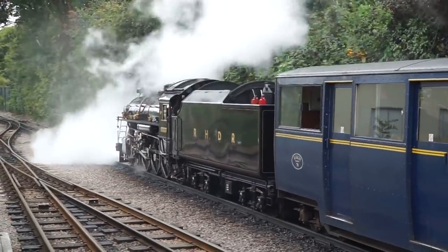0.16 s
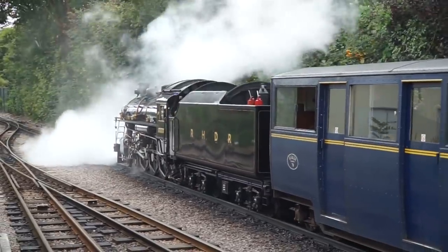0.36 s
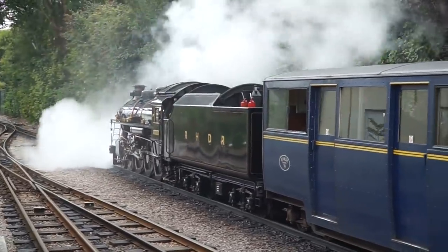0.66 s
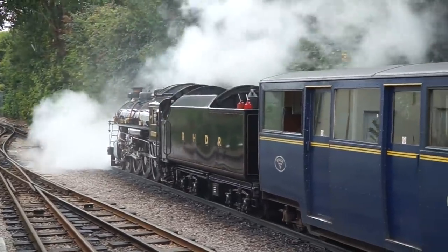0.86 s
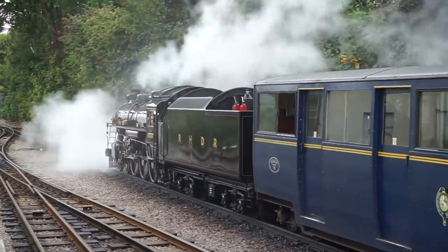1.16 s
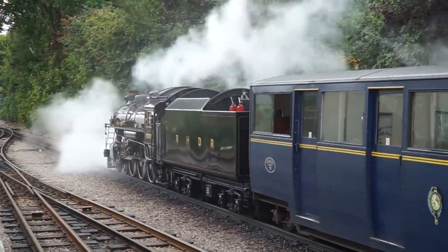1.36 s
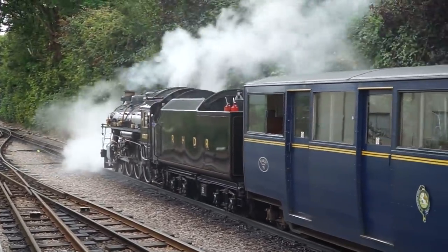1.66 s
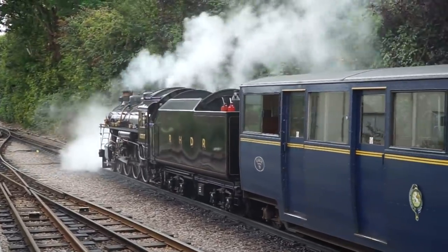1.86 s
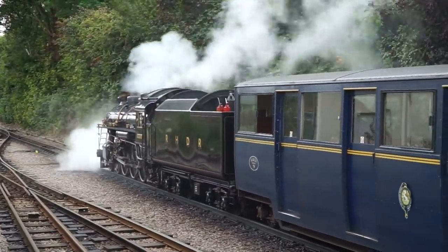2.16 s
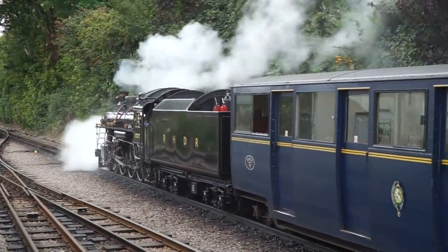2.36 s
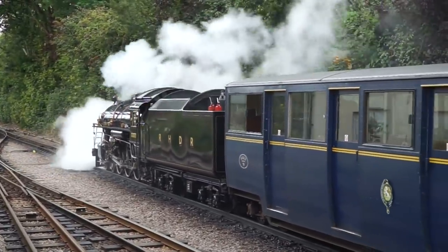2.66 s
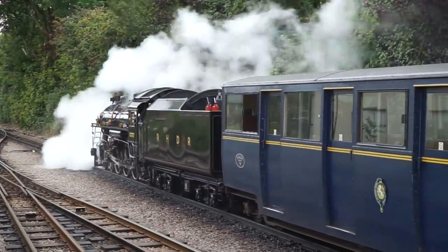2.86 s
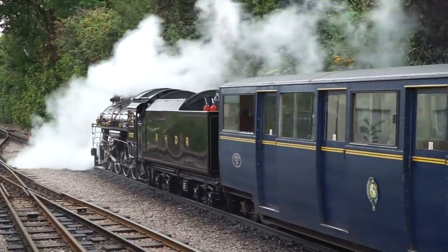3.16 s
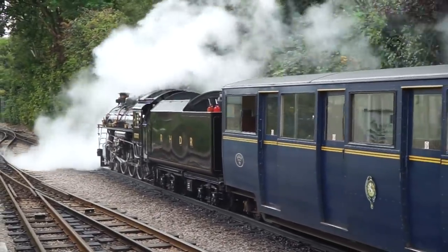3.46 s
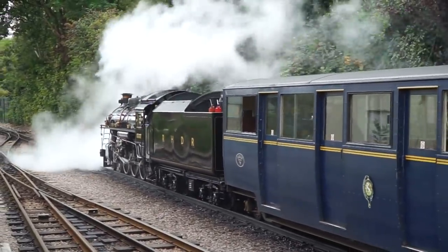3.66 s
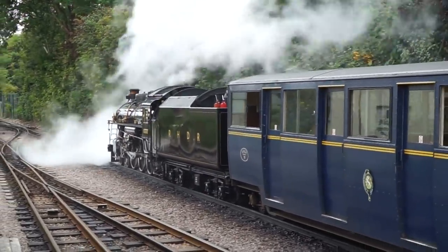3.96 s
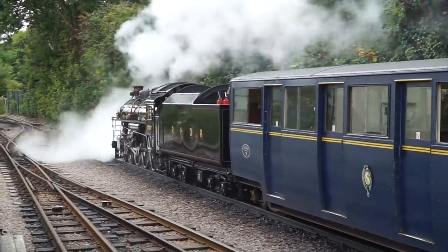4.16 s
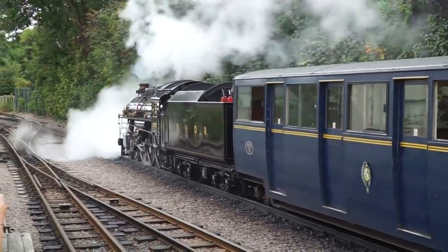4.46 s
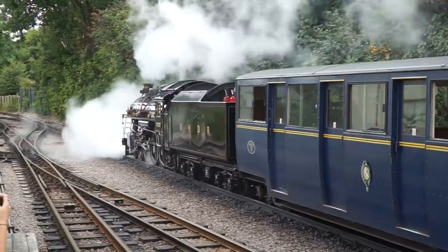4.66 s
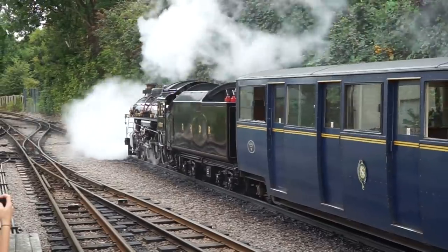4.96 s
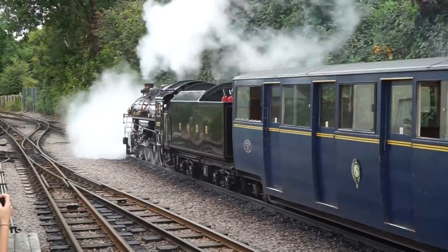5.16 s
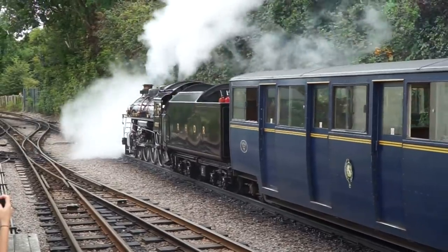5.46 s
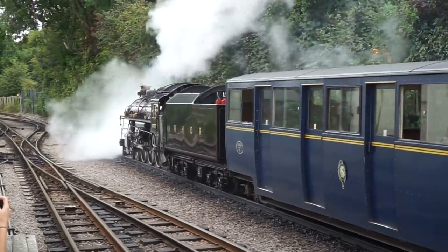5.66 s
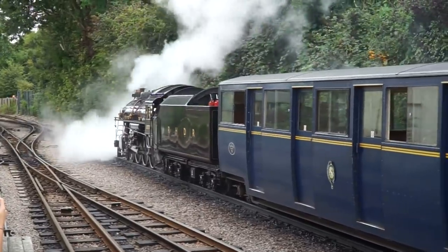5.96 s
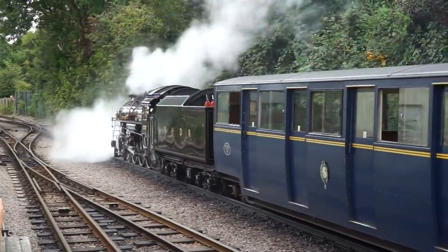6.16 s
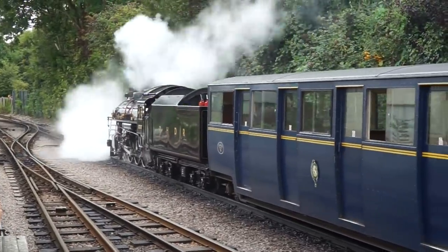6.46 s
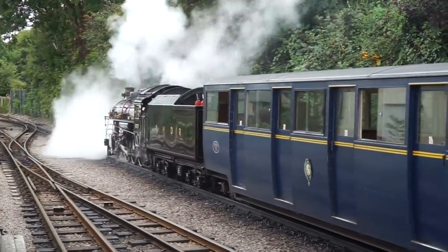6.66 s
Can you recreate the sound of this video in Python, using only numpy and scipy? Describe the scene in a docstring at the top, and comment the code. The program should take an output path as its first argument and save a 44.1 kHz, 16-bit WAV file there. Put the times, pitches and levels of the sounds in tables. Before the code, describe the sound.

Continuous escaping steam, wide and bright, shimmers over a breathy pipe-like roar. Underneath, muffled exhaust puffs come about three a second with uneven accents, gradually quickening. The open-air microphone catches a few brief wind bumps, then a violent burst of low flapping and cracking from about 2.6 to 4 seconds that pushes the steam down. Rumbling lingers mostly at left until 5.4 seconds; the steam then returns clearly.

```python
"""At a station, a miniature steam locomotive draws slowly away with its cylinder drain cocks open.
The jets are filtered noise: a bright hiss over a hollow roar with ringing pipes in it.
Beneath them the chimney beats softly in noise puffs, four to a wheel turn, gathering speed.
Wind buffets the two microphone ports as low noise with short hard blows; hiss and roar are heard
to dip under hard wind and recover slowly, and a limiter ducks everything at peaks over its ceiling."""
import sys
import numpy as np
from scipy import signal
from scipy.fft import rfft, irfft
from scipy.io import wavfile
from scipy.ndimage import uniform_filter1d, minimum_filter1d

SR = 44100
rng = np.random.default_rng(int(sys.argv[2]) if len(sys.argv) > 2 else 0)


def transcribe(u):
    """Save the signal u as a 16-bit wav file named by the first command-line argument.

    u: samples, shape (n,) or (channels, n), limited to [-1, 1]; the rate is SR.
    q: integer samples, one column per channel.
    """
    v = np.clip(np.atleast_2d(u).T, -1, 1)
    q = np.round(v * 32767).astype(np.int16)
    wavfile.write(sys.argv[1], SR, q)


N = 299872

# heard level of hiss and roar, including dips under hard wind and slow recoveries:
# time_s, relative level_db
HEARD_LEVEL = [(0, -26), (.45, -28.5), (1.46, -31), (1.85, -25.5), (2.14, -28.5), (2.58, -21), (2.82, -22),
               (2.92, -28), (3.38, -28.5), (3.58, -39.5), (3.88, -38), (4.15, -33), (4.35, -35.5),
               (5.2, -34.5), (5.45, -39), (6.02, -31), (6.53, -27), (6.8, -27)]


def drain_cocks(flutter_db=0.78, edge_hz=9000):
    """Turbulent jets: a bright hiss whose top comes and goes with their sharpness."""
    # spectrum of the hiss: frequency_hz, relative level_db per Hz
    hiss_colour = [(1500, -32.5), (3000, -12), (3900, -8.5), (5000, -3), (6400, -3), (8500, -0.5),
                   (11000, -1), (13300, -4), (15600, -7.5)]
    # sharpness of the jets: time_s, gain of the top_db, left minus right_db
    sharpness = [(0.0, 1.5, 2.5), (1.32, -0.5, 1.5), (2.71, -1, 2), (3.39, -2.5, 2), (3.58, -3.5, 1),
                 (4.66, -0.5, 2.5), (5.43, -0.5, 1), (6.34, 0, 3), (6.8, -4.5, 2)]
    heard_db, = in_time(HEARD_LEVEL)
    top_db, pan_db = in_time(sharpness)
    jet = patchy(airborne(hiss_colour))
    lowpass = signal.butter(1, edge_hz, fs=SR, output="sos")
    dull = signal.sosfiltfilt(lowpass, jet)
    top = jet - dull
    jet = dull + top * from_db(top_db)
    pan_each_db = pan_db * [[0.5], [-0.5]]
    return jet * from_db(heard_db + 3.0 + flutter_db * drift(4.9) + pan_each_db)


def steam_roar(flutter_db=0.83):
    """The broader, lower voice of the jets, with the drain pipes ringing as resonances in it."""
    # spectrum of the roar: frequency_hz, relative level_db per Hz
    roar_colour = [(500, -18.5), (1000, -21), (1280, -18), (1750, -7), (2170, -12), (2450, -4.5),
                   (3100, -7), (3650, -11), (5000, -14.5), (9000, -42)]
    # roar against the heard level: time_s, relative level_db
    roar_balance = [(0, -14), (1.4, -10), (1.9, -13), (3.1, -13.3), (3.45, -10.5), (4.15, -13.5),
                    (5.7, -11), (6.5, -15.5), (6.8, -13)]
    # resonances of the drain pipes: centre_hz, width_hz, level_db against the roar noise
    pipe_modes = [(1950, 250, -15), (2512, 110, -4.5), (2630, 180, -13), (6260, 200, -2)]
    heard_db, = in_time(HEARD_LEVEL)
    balance_db, = in_time(roar_balance)
    flow = airborne([(1000, 0), (10000, 0)])  # flat spectrum
    pipes = np.zeros((2, N))
    for centre_hz, width_hz, level_db in pipe_modes:
        pipes += from_db(level_db) * rms_one(resonate(flow, centre_hz, width_hz))
    voice = patchy(airborne(roar_colour) + pipes, broad_db=0.2, fine_db=1.9)
    return voice * from_db(heard_db + balance_db + 2.0 + flutter_db * drift(29))


def chimney(rise_s=0.017, count=21):
    """A hollow draught, and a soft puff each time a cylinder exhausts, at ever shorter gaps."""
    # draught through the smokebox and rolling gear: time_s, level_db
    draught_level = [(0, -44), (1.7, -40.5), (2.6, -39), (3.0, -51), (4.2, -49.5), (6.8, -48)]
    # spectrum of the draught: frequency_hz, relative level_db per Hz
    draught_colour = [(30, 12), (80, 5.5), (200, 2), (330, -0.5), (460, -8), (570, -11), (680, -3),
                      (750, 2), (840, 2.5), (910, -2), (1300, -9), (2500, -16.5)]
    # spectrum of the puffs: frequency_hz, relative level_db per Hz
    puff_colour = [(60, 4), (150, 2), (280, -2.5), (450, -4.5), (600, -6), (800, -25), (1100, -12),
                   (2500, -32)]
    # the four uneven beats of a wheel turn: level_db against the draught
    beat_accents_db = [1, -4.5, -9, -10]
    beat_s, gap_s, gap_shrink_s = 0.233, 0.3605, 0.005  # first beat, first gap, loss per gap
    draught_db, = in_time(draught_level)
    beats = np.zeros(N)
    for k in range(count):
        age = np.clip((np.arange(N) / SR - beat_s) / rise_s, 0, 20)
        puff = age * np.exp(1 - age)  # peaks at 1 after the rise time
        beats += from_db(beat_accents_db[k % len(beat_accents_db)]) * puff
        beat_s += gap_s - gap_shrink_s * k
    draught = airborne(draught_colour)
    puffs = airborne(puff_colour) * beats
    return (draught + puffs) * from_db(draught_db)


def wind_levels():
    """Level of the wind at each port in dB: the powers of steady flow and gusts add."""
    # steady wind on the ports: time_s, left_db, right_db
    steady_wind = [(0, -46, -58), (.95, -48.5, -47), (1.25, -44, -35), (1.7, -51, -46), (2.52, -34, -33),
                   (2.62, -24, -17.5), (2.82, -19, -15), (2.92, -10, -10.5), (3.04, -24.5, -20.5),
                   (3.32, -20, -21), (3.52, -12.5, -22.5), (3.8, -17, -20), (3.9, -21.5, -29),
                   (4.12, -36, -31.5), (4.3, -24, -33.5), (5.37, -20.5, -33), (5.56, -42, -52),
                   (6.8, -41, -34)]
    # short gusts on top of it: centre_s, length_s, left_db, right_db
    gusts = [(0.056, 0.027, -31.5, -54), (1.079, 0.054, -26, -15.5), (1.913, 0.067, -31, -48),
             (2.183, 0.065, -26, -37), (2.351, 0.069, -16.5, -19.5), (2.414, 0.052, -22, -17.5),
             (5.791, .035, -30, -31), (6.226, .05, -23.5, -35), (6.377, 0.078, -25.5, -37),
             (6.743, 0.21, -24, -28)]
    power = from_db(in_time(steady_wind)) ** 2
    for centre_s, length_s, left_db, right_db in gusts:
        gust = from_db([[left_db], [right_db]]) * passing(centre_s, length_s)
        power = power + gust ** 2
    return 10 * np.log10(power)


def wind_port(port, wind_db, rumble_db, eddy_db, crack_db=4.0, strong_db=-22.0, growth=1.86,
              lumpy_db=6.0, surge_db=2.2, waver_db=2.2, crackle_db=-21.5, ragged_db=6.0):
    """Air tumbles over one port: a rumble, eddies that catch up with it in strong wind, hard buffets."""
    # spectrum of the rumble: frequency_hz, relative level_db per Hz
    rumble_colour = [(15, -28), (30, -15.5), (50, 1), (80, 5), (130, -1), (200, -8), (300, -14.5),
                     (450, -30), (800, -41.5), (1500, -54)]
    # spectrum of the small eddies and thuds: frequency_hz, relative level_db per Hz
    eddy_colour = [(40, -2.5), (120, 3), (240, 3.5), (400, -4), (650, -18.5), (1000, -29), (1600, -43),
                   (3000, -71)]
    # spectrum of the cracks: frequency_hz, relative level_db per Hz
    crack_colour = [(200, -8), (500, 10), (750, 0.5), (1100, -8.5), (1600, -17), (2400, -28), (5000, -53)]
    # hard eddies that strike one port: centre_s, port, thud_db, relative crack_db, length_s
    buffets = [(2.714, "right", -9, -46, 0.015), (2.719, "left", -16, -45, 0.019),
               (2.786, "right", -12.5, -31, 0.011), (2.857, "right", -4, -23.5, 0.023),
               (2.902, "left", 2, -13, 0.01), (2.917, "right", -9, -14.5, .022),
               (2.93, "left", -6, -11.5, 0.012), (3.093, "left", -8, -54, 0.0066),
               (3.125, "left", -15.5, -31, 0.0069), (3.183, "right", -21, -31, 0.011),
               (3.325, "right", -9, -23.5, 0.014), (3.426, "right", -6.5, -37, 0.013),
               (3.553, "left", -7, -31, 0.016), (3.798, "left", -14.5, -24, .007),
               (3.822, "right", -23, -31, .012), (3.844, "right", -24, -21, 0.0073),
               (3.859, "right", -18, -27.5, 0.0095), (3.941, "left", -13, -37, 0.012),
               (3.994, "left", -15, -31, 0.006), (4.24, "left", -21.5, -40, 0.0086),
               (4.291, "left", -14.5, -48, 0.0064), (4.622, "left", -13.5, -43, 0.011),
               (5.261, "left", -7.5, -27, 0.0088), (5.282, "left", -2.5, -14, 0.018),
               (5.32, "left", -20, -26, 0.0086), (5.346, "left", -16, -22.5, 0.013),
               (5.405, "left", -14.5, -35, 0.0087), (6.347, "left", -24.5, -59, 0.0085)]
    wind_db = wind_db + waver_db * drift(4.3)
    lumps = drift(49)  # each lump of air lifts the rumble and its eddies together
    rumble = evened(noise(rumble_colour), span_s=0.038)
    rumble = rumble * from_db(wind_db + rumble_db + surge_db * lumps)
    # below strong_db the eddies fall off faster than the wind does
    weakness_db = (growth - 1) * np.minimum(wind_db - strong_db, 0)
    churn = from_db(wind_db + eddy_db + weakness_db + lumpy_db * lumps)
    thuds = np.zeros(N)
    cracks = churn * from_db(crackle_db + ragged_db * drift(60))
    for centre_s, struck, low_db, high_db, length_s in buffets:
        if struck == port:
            eddy = passing(centre_s, length_s)
            thuds += from_db(low_db) * eddy
            cracks += from_db(high_db + crack_db) * eddy ** 2  # fine swirls sit in the eddy's core
    eddies = evened(noise(eddy_colour), span_s=0.01025) * np.hypot(churn, thuds)
    crackle = evened(noise(crack_colour), span_s=0.014) * cracks
    return rumble + eddies + crackle


def patchy(x, broad_db=1.0, fine_db=2.47, broad_hz=280, fine_hz=45, life_s=0.19,
           sing_share=0.03, sing_s=0.23, size=2048):
    """Hot, swirling air focuses the sound by turns: patches of the spectrum swell and fade."""
    # the jets sing briefly in one band: centre_s, centre_hz, boost_db
    singing = [(.35, 8650, 6.5), (.5, 13400, 5), (2.25, 6500, 4.5), (3.0, 5560, 7), (4.2, 8050, 4),
               (4.95, 4030, 10.5), (6.3, 10650, 5), (6.75, 5470, 6)]
    hz, t, frames = signal.stft(x, SR, nperseg=size)
    shape = (len(hz), len(t))
    life_frames = life_s / t[1]
    gain_db = broad_db * swirl(shape, broad_hz / hz[1], life_frames)
    gain_db = gain_db + fine_db * swirl(shape, fine_hz / hz[1], life_frames)
    for centre_s, centre_hz, boost_db in singing:
        off_pitch = (hz[:, None] / centre_hz - 1) / sing_share
        off_time = (t - centre_s) / sing_s
        gain_db = gain_db + boost_db * np.exp(-off_pitch ** 2 - off_time ** 2)
    _, shaped = signal.istft(frames * from_db(gain_db), SR)
    return rms_one(shaped[:, :N])


def swirl(shape, rows, columns):
    """A smooth random field of spread 1: white chance averaged over frequency and time."""
    field = rng.standard_normal(shape)
    for _ in range(2):
        field = uniform_filter1d(field, max(round(rows), 1), axis=0, mode="wrap")
        field = uniform_filter1d(field, max(round(columns), 1), axis=1, mode="wrap")
    return rms_one(field)


def airborne(colour):
    """Stereo noise from ahead, less alike at the two ports as the pitch rises overall."""
    # how the ports hear the engine: frequency_hz, correlation, left minus right_db, left phase lead_rad
    port_hearing = np.array([(60, 1, 4, 0), (300, 1, 1, 0), (800, 0.89, 1.5, 0), (1290, 0.77, 1.5, 0.25),
                             (2500, 0.88, -0.5, 0.055), (4400, 0.66, -1.5, 0.36), (6500, 0.52, -1.7, 0.042),
                             (8700, 0.51, -4.5, 1.33), (11700, .42, 2.5, 1.36), (16000, .35, -2.5, 1.2)])
    hz = bins_hz()
    alike, pan_db, lead_rad = (at_hz(port_hearing[:, [0, k]], hz) for k in range(1, 4))
    alike = np.clip(alike, -1, 1)
    ears = np.array([[1], [-1]])  # left, right
    mid, side = rfft(rng.standard_normal((2, N)))
    both = np.sqrt(1 + alike) * mid + np.sqrt(1 - alike) * side * ears
    gain = from_db(at_hz(colour, hz) + ears * pan_db / 2)
    phase = np.exp(0.5j * ears * lead_rad)
    return rms_one(irfft(both * gain * phase, N))


def noise(colour):
    """One channel of noise with the given spectrum, at unit power."""
    spectrum = rfft(rng.standard_normal(N))
    return rms_one(irfft(spectrum * from_db(at_hz(colour, bins_hz())), N))


def resonate(x, hz, width_hz):
    """A two-pole resonance with gain 1 on top."""
    r = np.exp(-np.pi * width_hz / SR)
    zeros = np.array([1, 0, -1]) * (1 - r * r) / 2
    poles = [1, -2 * r * np.cos(2 * np.pi * hz / SR), r * r]
    return signal.lfilter(zeros, poles, x)


def evened(x, span_s):
    """Take the slow swells out of a noise and keep its single lumps."""
    local_power = uniform_filter1d(x ** 2, max(int(span_s * SR), 2))
    return x / np.sqrt(local_power + 0.0084)


def passing(centre_s, length_s):
    """A bell-shaped swell as a body of air goes by."""
    distance = (np.arange(N) / SR - centre_s) / length_s
    return np.exp(-2 * np.minimum(distance ** 2, 10))


def drift(rate_hz):
    """Slow chance with spread 1: noise through two equal one-pole lowpasses."""
    step = 40  # samples between drawn values
    r = np.exp(-2 * np.pi * rate_hz * step / SR)
    chance = rng.standard_normal(N // step + 2002)
    slow = signal.lfilter([1], [1, -2 * r, r * r], chance)[2000:]  # drop the filter's start
    return np.interp(np.arange(N) / step, np.arange(len(slow)), rms_one(slow))


def from_db(db):
    """Decibels to amplitude gain."""
    return 10 ** (np.asarray(db) / 20)


def rms_one(x):
    """Scale to unit power."""
    return x / np.sqrt(np.mean(x ** 2) + 1e-20)


def in_time(rows):
    """Each column of a curve at every sample."""
    time_s, *columns = np.transpose(rows)
    return [np.interp(np.arange(N) / SR, time_s, column) for column in columns]


def at_hz(points, hz):
    """Read a spectrum on a log-frequency axis."""
    f, value = np.transpose(points)
    return np.interp(np.log(np.maximum(hz, 1)), np.log(f), value)


def bins_hz():
    """Frequencies of the spectrum of a whole signal."""
    return np.arange(N // 2 + 1) * SR / N


def scene():
    """The engine ahead, the wind at the microphone ports."""
    engine = drain_cocks() + steam_roar() + chimney()
    left_db, right_db = wind_levels()
    left = wind_port("left", left_db, rumble_db=0.0, eddy_db=-12.0)
    right = wind_port("right", right_db, rumble_db=-1.5, eddy_db=-13.0)
    return engine + np.array([left, right])


def limiter(x, ceiling_db=-4.6, release_db_per_s=118.0):
    """Both channels duck together when a peak passes the ceiling, then recover."""
    peak_db = 20 * np.log10(np.abs(x).max(axis=0) + 1e-9)
    over_db = np.maximum(peak_db - ceiling_db, 0)
    ramp_db = release_db_per_s * np.arange(N) / SR
    held_db = np.maximum.accumulate(over_db + ramp_db) - ramp_db  # jumps up, then falls steadily
    widened_db = minimum_filter1d(-held_db, size=88)  # 2 ms, so the gain is down around each peak
    return x * from_db(uniform_filter1d(widened_db, size=88))


def record(dry):
    """Limiter, then a steep elliptic lowpass that cuts the top."""
    lowpass = signal.ellip(12, 0.1, 80, 15750, fs=SR, output="sos")  # ripple dB, stop dB, cutoff Hz
    return signal.sosfilt(lowpass, limiter(dry))


dry = scene()
out = record(dry)
transcribe(out)
```